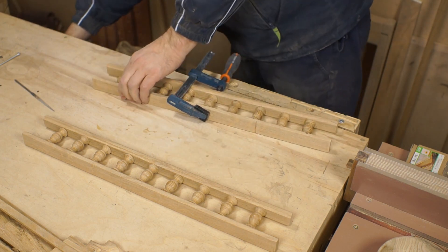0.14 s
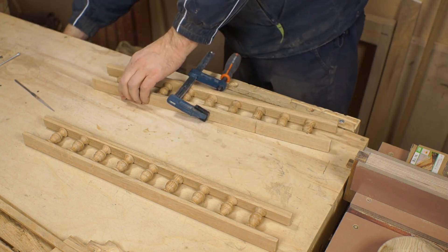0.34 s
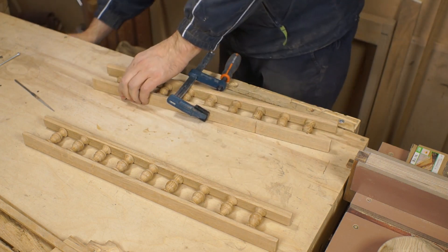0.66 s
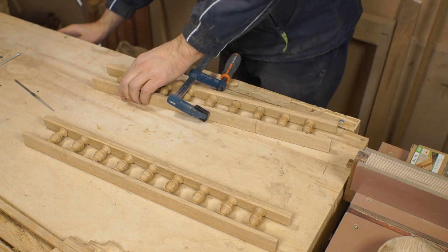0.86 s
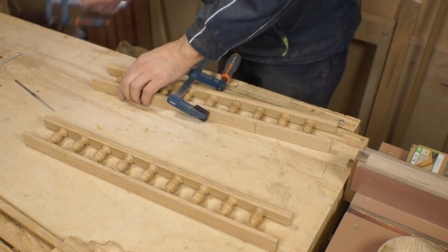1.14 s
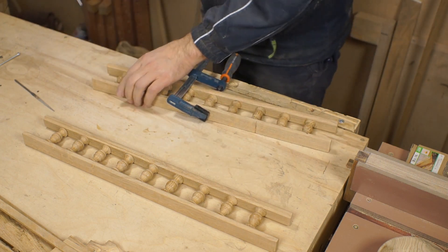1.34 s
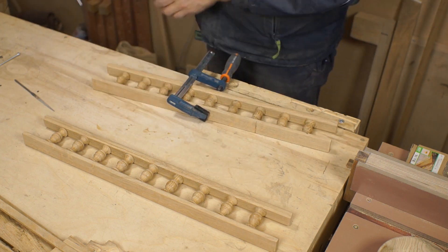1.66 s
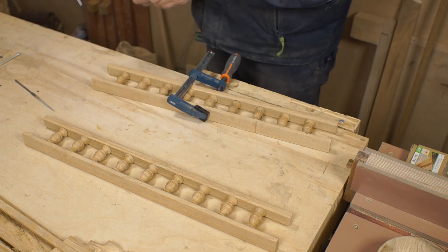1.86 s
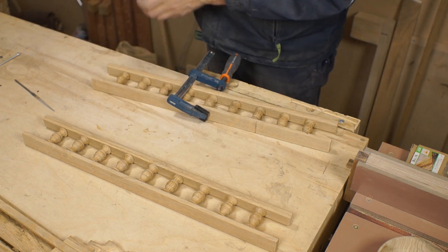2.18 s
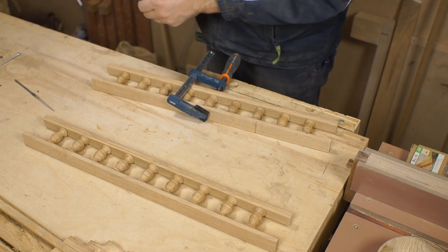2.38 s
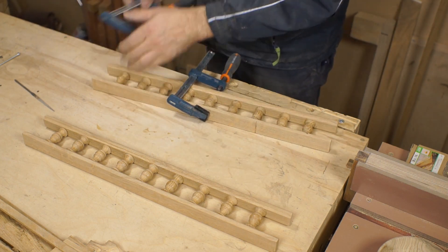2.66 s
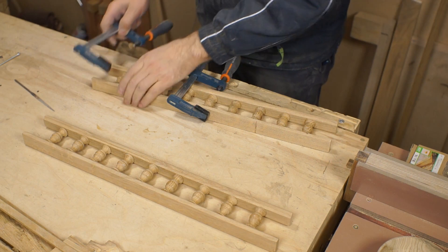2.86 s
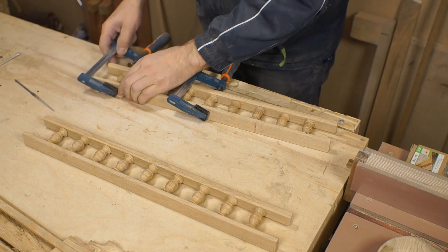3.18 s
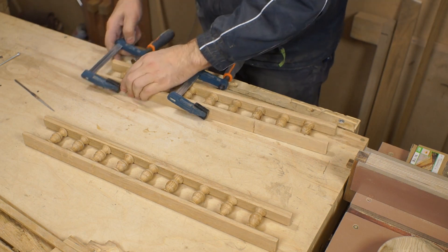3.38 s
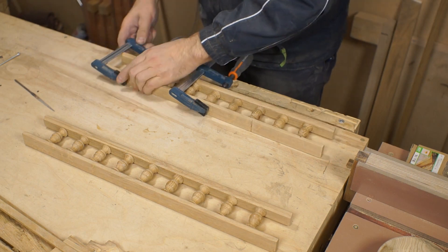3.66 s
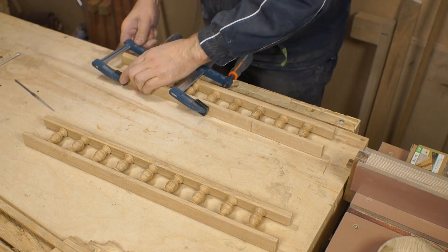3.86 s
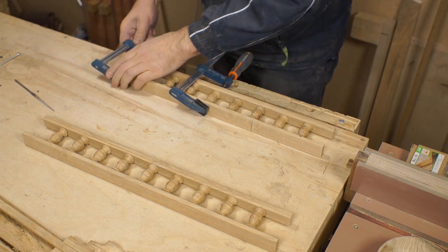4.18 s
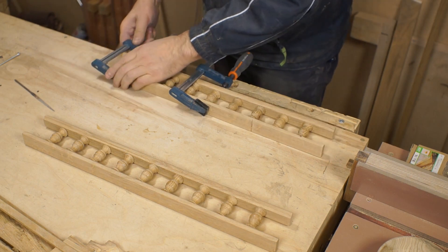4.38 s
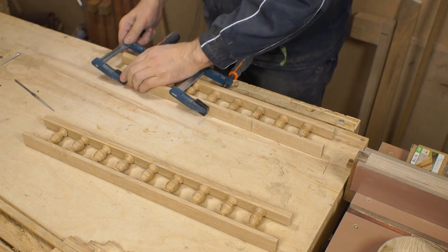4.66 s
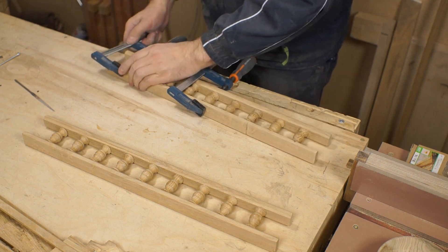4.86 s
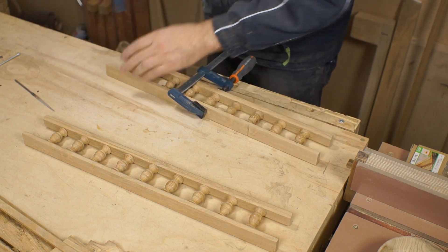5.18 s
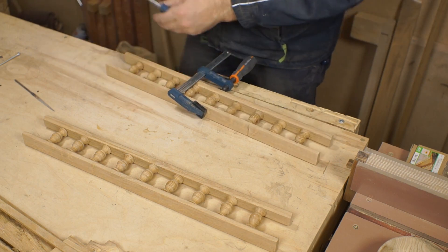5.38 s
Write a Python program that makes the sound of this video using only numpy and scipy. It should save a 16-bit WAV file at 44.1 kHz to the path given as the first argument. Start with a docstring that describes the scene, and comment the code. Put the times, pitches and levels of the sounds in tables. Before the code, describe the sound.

A wooden railing thumps and drags on a workbench, with a few ringing clinks and dry clacks from a steel bar clamp. After a short lull, the clamp's jaw rattles and clicks along its serrated bar. More wooden knocks and scrapes follow with a second, shorter slide, then two firm thumps and light metal clicks. Sleeves rustle faintly. It all sounds close, in a small, quiet workshop.

```python
"""Clamping a wooden railing

In a small workshop, a glued railing thumps and drags on a bench while a steel bar clamp is fitted.
The bar rings as it is picked up; the jaw rattles along its serrations, catches and clacks to a stop.
The screw squeaks faintly, and sleeves rustle between the moves."""
import sys
import numpy as np
from scipy import signal
from scipy.fft import rfft, irfft, next_fast_len
from scipy.io import wavfile

SR = 44100
rng = np.random.default_rng(int(sys.argv[2]) if len(sys.argv) > 2 else 0)


def waveform_to_disk(signal):
    """Save audio, clipped to [-1, 1], as 16-bit WAV at the path in sys.argv[1]."""
    frames = np.transpose(np.atleast_2d(signal))
    scaled = np.clip(frames, -1, 1) * 32767
    samples = np.round(scaled).astype(np.int16)
    wavfile.write(sys.argv[1], SR, samples)


N = 243873
RING_TIME_S = np.arange(int(SR * .7)) / SR


def amp(db):
    """Decibels to gain."""
    return 10 ** (np.asarray(db) / 20)


def unit_rms(x):
    """Scales to rms 1."""
    return x / np.sqrt(np.mean(x ** 2) + 1e-20)


def unit_hit(x):
    """Scales to the energy of 30 ms at rms 1."""
    return x * np.sqrt(SR * .03 / (np.sum(x ** 2) + 1e-20))


def lookup(points, hz):
    """Interpolates a table over log frequency."""
    points_hz, values = np.transpose(points)
    return np.interp(np.log(hz + 1), np.log(points_hz + 1), values)


def add(mix, time_s, sound):
    """Mixes a sound in at time_s."""
    part = mix[max(round(time_s * SR), 0):][:len(sound)]
    part += sound[:len(part)]


def colour(x, spectrum):
    """Filters by (frequency [Hz], level [dB]) points; rms 1."""
    size = next_fast_len(len(x))
    gain = amp(lookup(spectrum, np.fft.rfftfreq(size, 1 / SR)))
    return unit_rms(irfft(rfft(x, size) * gain, size)[:len(x)])


def butter(x, hz, kind):
    """Second-order low-pass or high-pass."""
    return signal.lfilter(*signal.butter(2, np.clip(hz, 20, SR * .45), kind, fs=SR), x)


def decay(t60_s):
    """Exponential decay."""
    return np.exp(-np.log(1000) * RING_TIME_S / t60_s)


def attack(rise_s, delay_s=0):
    """Exponential rise to 1."""
    return 1 - np.exp(-np.maximum(RING_TIME_S - delay_s, 0) / rise_s)


def ring(modes, pitch=1, spread_db=0):
    """Decaying modes; spread_db varies their strengths, as the place struck does."""
    out = np.zeros(len(RING_TIME_S))
    for k, (hz, db, t60_s) in enumerate(modes):
        gain = (-1) ** k * amp(db + spread_db * rng.standard_normal())
        out += gain * decay(t60_s) * np.sin(2 * np.pi * hz * pitch * RING_TIME_S)
    return out


def dense_ring(spectrum, t60_s):
    """Unresolved modes: a decaying noise burst."""
    return unit_hit(colour(rng.standard_normal(len(RING_TIME_S)), spectrum) * decay(t60_s))


def stick_slip(rate_hz, spread_db, hiss, burst_s=.0007):
    """Friction: uneven noise bursts over a steady hiss."""
    size = amp(spread_db * np.minimum(rng.exponential(1, N), 3))
    slips = rng.random(N) < rate_hz / SR
    power = signal.lfilter([1], [1, -np.exp(-1 / (burst_s * SR))], size ** 2 * slips)
    return unit_rms(np.sqrt(power / power.mean() + hiss ** 2) * rng.standard_normal(N))


def stroke(start_s, length_s, rise_s, t60_s):
    """Envelope of a push: rise, hold, decay."""
    t = np.arange(N) / SR - start_s
    return np.clip(t / rise_s, 0, 1) * np.exp(-np.log(1000) * np.clip((t - length_s) / t60_s, 0, 2))


def swells(moves):
    """Envelope of smooth moves, one bell curve each."""
    t = np.arange(N) / SR
    power = sum(amp(2 * db) * np.exp(-np.minimum((2 * (t - peak_s) / length_s) ** 2, 20))
                for peak_s, length_s, db in moves)
    return np.sqrt(power)


# Wood set down: (time [s], level [dB], contact hardness [Hz], mode pitch [ratio])
WOOD_KNOCKS = [(0.137, -34.5, 343, 1.195), (0.14, -44, 1300, 1.09), (0.612, -58, 398, 1.7),
               (0.738, -48, 1290, 1), (0.757, -39.5, 1200, 0.92), (0.823, -34.5, 564, 1.62),
               (0.841, -38, 470, 1.8), (0.917, -40, 1140, 0.79), (0.922, -37.5, 454, 1.73),
               (0.936, -43.5, 500, 1.4), (0.976, -48.5, 910, 0.97), (1.145, -45, 1020, 0.89),
               (1.152, -40.5, 570, 1.08), (2.903, -62.5, 213, 0.99), (3.172, -40.5, 576, 1.09),
               (3.193, -48, 930, 0.97), (3.272, -44.5, 416, 0.95), (3.577, -44.5, 400, 1.1),
               (3.705, -47.5, 480, 1.0), (3.811, -47, 1040, 0.98), (3.859, -44, 355, 1.02),
               (4.552, -35.5, 397, 0.98), (4.568, -49, 816, 1.02), (4.941, -34, 396, 1.006),
               (4.966, -44, 870, 1.0)]
# Bench top and railing: (frequency [Hz], level [dB], T60 [s])
BENCH_MODES = [(69.9, -5.5, 0.63), (94.3, -12, 0.13), (149.7, 13, 0.17), (183, 8, 0.017),
               (245.7, -0.5, 0.076), (310, -8, 0.029), (364, -13.5, 0.44), (407, -28, 0.06),
               (572, -13, 0.19), (629, -2.5, 0.21), (710, -15, 0.085), (889, -1, 0.14), (1150, -33, 0.051),
               (1384, -2, 0.091)]
# Dense wood modes: (frequency [Hz], level [dB])
WOOD_SPECTRUM = [(60, -37), (150, -2.5), (350, 3.5), (700, -5.5), (1300, -6.5), (2500, -7), (6000, -1.5),
                 (15000, -1.5)]


def knocks(dense_db=9, dense_db_per_octave=6.5, bass_cut_ratio=.27):
    """Railing hits bench: soft contacts ring the low modes, light, hard ones the high."""
    out = np.zeros(N)
    for time_s, db, hard_hz, pitch in WOOD_KNOCKS:
        body = unit_hit(ring(BENCH_MODES, pitch, spread_db=4))
        body += amp(dense_db + dense_db_per_octave * np.log2(pitch)) * dense_ring(WOOD_SPECTRUM, .17)
        body = butter(body, hard_hz, "low")
        body = butter(body, 1.89 * hard_hz, "low")  # rounded contact, no sharp edge
        body = butter(body, bass_cut_ratio * hard_hz * pitch, "high")
        add(out, time_s, amp(db) * unit_hit(body))
    return out


# Shoves: (start [s], length [s], level [dB], groan [dB re rasp], shudder [dB re rasp])
SHOVES = [(0.079, 0.074, -58, -5, -2), (0.14, 0.17, -54.5, -5, -13), (0.297, 0.049, -45.5, -14, -7.5),
          (0.36, 0.17, -51, -5.5, 3.5), (0.55, 0.14, -59.5, -9, -1), (0.76, 0.2, -50.5, -3, -0.5),
          (2.999, 0.035, -64.5, -19, -2.5), (3.22, 0.17, -62, -13, -12), (3.38, 0.17, -52, 1.5, -25),
          (3.53, 0.098, -54, 5.5, -23), (3.688, 0.046, -49.5, -2, -14), (3.82, 0.032, -53, -2.5, -1),
          (4.0, 0.22, -74.5, -6, -4), (4.449, 0.017, -70, 1.5, 7.5), (4.76, 0.12, -55, 2, -4.5),
          (4.98, 0.14, -65.5, -6, 5.5)]
# Wood on wood: (frequency [Hz], level [dB])
RASP_SPECTRUM = [(50, -15), (80, -37), (115, -18), (170, -4), (250, 8), (380, -5.5), (600, 2), (900, -5),
                 (1400, -7.5), (2200, -15.5), (5000, -23), (10000, -32.5), (16000, -46)]
# Railing groan: (frequency [Hz], level [dB], T60 [s])
GROAN_MODES = [(171, -0.5, 0.15), (324, 5.5, 0.047), (374, 4.5, 0.17), (407, -2, 0.11), (546.5, -0.5, 0.12),
               (580, -23.5, 0.2)]
# Bench shudder: (frequency [Hz], level [dB], T60 [s])
SHUDDER_MODES = [(71, -9, 0.34), (95.6, -9, 0.2), (156.7, 0.5, 0.26), (169.5, 2.5, 0.081), (219, -3, 0.17)]


def railing_drag():
    """Wood judders over wood; the railing groans and the bench top shudders."""
    judder = stick_slip(rate_hz=300, spread_db=4, hiss=.78, burst_s=.0045)
    rasp = colour(judder, RASP_SPECTRUM)
    groan = unit_rms(signal.fftconvolve(judder, ring(GROAN_MODES))[:N])
    shudder = unit_rms(signal.fftconvolve(judder, ring(SHUDDER_MODES))[:N])
    out = np.zeros(N)
    for start_s, length_s, db, groan_db, shudder_db in SHOVES:
        envelope = amp(db) * stroke(start_s, length_s, rise_s=.025, t60_s=.13)
        out += envelope * (rasp + amp(groan_db) * groan + amp(shudder_db) * shudder)
    return out


# Jaw pushes: (start [s], length [s], level [dB], brightness [Hz])
JAW_PUSHES = [(2.124, 0.022, -61, 5000), (2.145, 0.094, -49.5, 8000), (2.255, 0.098, -49, 15200),
              (2.362, 0.039, -45, 11400), (2.417, 0.055, -54.5, 10000), (3.391, 0.18, -71, 6000),
              (3.542, 0.06, -62, 12900), (3.599, 0.073, -54.5, 9900), (3.677, 0.023, -46.5, 7050)]
# Serration chatter: (frequency [Hz], level [dB])
CHATTER_SPECTRUM = [(300, -41), (600, -18), (900, -11), (1500, -4.5), (2300, -8.5), (3000, -3.5),
                    (3700, 5.5), (5000, 1.5), (6500, 3), (8500, 3), (9700, -11), (12300, 0), (13300, -28),
                    (15500, -7)]


def jaw_slide(dull_hz=4500, bright_hz=15000):
    """The jaw chatters over the serrations, brighter on faster pushes."""
    chatter = colour(stick_slip(rate_hz=660, spread_db=6, hiss=.59, burst_s=.0014), CHATTER_SPECTRUM)
    dull = unit_rms(butter(chatter, dull_hz, "low"))
    bright = unit_rms(butter(chatter, bright_hz, "low"))
    out = np.zeros(N)
    for start_s, length_s, db, hz in JAW_PUSHES:
        speed = np.clip((hz - dull_hz) / (bright_hz - dull_hz), 0, 1)
        blend = np.sqrt(1 - speed) * dull + np.sqrt(speed) * bright
        out += amp(db) * stroke(start_s, length_s, rise_s=.012, t60_s=.071) * blend
    return out


def jaw_rattle(rate_hz=55, offset_db=-3, spread_db=4, ring_db=-4.5):
    """Small, uneven catches of the sliding jaw, as rows like HARD_CATCHES."""
    rows = []
    for start_s, length_s, push_db, bright_hz in JAW_PUSHES:
        for k, (jitter, size, place) in enumerate(rng.random((20, 3))):
            after_s = (k + jitter) / rate_hz
            if after_s < length_s:
                db = push_db + offset_db + spread_db * (2 * size - 1)
                rows.append((start_s + after_s, db, ring_db, bright_hz * 2 ** (place - .5)))
    return rows


# Jaw catches on the bar: (time [s], level [dB], ring [dB re snap], ring centre [Hz])
HARD_CATCHES = [(1.938, -56.5, 8.5, 1900), (1.986, -58.5, 6, 3230), (2.154, -42, -5, 2590),
                (2.173, -48, 7, 2800), (2.194, -48, -14, 2980), (2.205, -43, -7, 6070),
                (2.224, -48, 6, 2960), (2.242, -46.5, -4, 3500), (2.263, -43.5, -5, 6000),
                (2.271, -47.5, -7, 7000), (2.283, -42, 4, 7200), (2.309, -47.5, -2, 8400),
                (2.371, -55, 2, 9050), (2.398, -46.5, -21, 7500), (2.576, -64, 4, 4500),
                (2.622, -58, 2, 11300), (2.628, -47, 4, 2530), (2.636, -47, 6, 5260), (2.646, -44, 0, 2580),
                (2.689, -56.5, -4, 11100), (3.181, -65.5, 10, 3570), (3.286, -72.5, 14, 4500),
                (3.551, -58.5, -10, 11010), (3.576, -55.5, -14, 11000), (3.604, -49, -17, 9000),
                (3.622, -56, -19, 7900), (3.655, -50, 1, 6000), (3.686, -53, 14, 9700),
                (3.703, -49.5, 8.5, 3720), (3.809, -56.5, 14, 3640), (5.417, -56.5, 5, 3930),
                (5.437, -51.5, 0.5, 8000), (5.508, -63.5, 1, 4000)]
# Gripped clamp: (frequency [Hz], level [dB], T60 [s])
JAW_MODES = [(2030, -3, 0.1), (2376, 3, 0.058), (2503, 1, 0.056), (3363, -2, 0.077), (3680, 5, 0.03),
             (3780, -5, 0.088), (4130, -4, 0.047), (6070, -7.5, 0.1), (6550, -15, 0.12),
             (7400, -13.5, 0.09), (9270, -4, 0.046), (9780, -0.5, 0.037), (11400, -9, 0.14),
             (12900, -16, 0.047)]
# Dense steel modes: (frequency [Hz], level [dB])
STEEL_SPECTRUM = [(100, -52), (400, -50), (900, -12), (1600, -13), (2400, -0.5), (3700, 2.5), (5000, -2.5),
                  (6500, 6), (8500, 1.5), (9800, 2.5), (12000, 1), (13500, 0), (16000, -8)]


def jaw_catches(crack_db=2, detune=.007, focus_db_per_octave=24):
    """Snap, crack and hand-damped ring; the jaw's position picks and detunes the modes."""
    out = np.zeros(N)
    for time_s, db, ring_db, centre_hz in HARD_CATCHES + jaw_rattle():
        hard_hz = 6760 * (centre_hz / 4000) ** .53
        modes = [(hz, mode_db - focus_db_per_octave * abs(np.log2(hz / centre_hz)), t60_s)
                 for hz, mode_db, t60_s in JAW_MODES]
        snap = unit_hit(butter(dense_ring(STEEL_SPECTRUM, t60_s=.0065), .8 * hard_hz, "low"))
        crack = unit_hit(butter(dense_ring(STEEL_SPECTRUM, t60_s=.082), hard_hz, "low"))
        ringing = unit_hit(ring(modes, pitch=1 + detune * rng.standard_normal()))
        tail = (amp(crack_db) * crack + amp(ring_db) * ringing) * attack(rise_s=.00056)
        add(out, time_s, amp(db) * unit_hit(snap + tail))
    return butter(out, 1200, "high")  # the catches carry no low thump


# Clamp on wood: (time [s], level [dB], contact hardness [Hz], T60 [s])
CLAMP_HITS = [(0.144, -56.5, 6200, 0.18), (0.19, -62, 11900, 0.078), (0.607, -42, 2370, 0.28),
              (0.612, -44.5, 2640, 0.093), (0.76, -44.5, 2920, 0.039), (0.822, -51.5, 2440, 0.23),
              (1.144, -60.5, 3520, 0.016), (4.551, -61.5, 3000, 0.038), (4.922, -48.5, 6750, 0.089),
              (4.942, -54.5, 3520, 0.33)]
# Dense clamp modes: (frequency [Hz], level [dB])
CLACK_SPECTRUM = [(400, 1.5), (900, -11.5), (1600, -3), (3000, -1.5), (5000, -6.5), (7500, -3.5),
                  (11000, -7.5), (16000, -16)]


def clamp_clacks():
    """The clamp strikes wood with a dry clack."""
    out = np.zeros(N)
    for time_s, db, hard_hz, t60_s in CLAMP_HITS:
        clack = butter(dense_ring(CLACK_SPECTRUM, t60_s), hard_hz, "low")
        add(out, time_s, amp(db) * unit_hit(clack))
    return out


# Strikes on the hanging bar: (time [s], level [dB], contact hardness [Hz])
BAR_HITS = [(0.309, -46.5, 7600), (0.456, -47, 10100), (0.491, -49, 8140)]
# Bar bending: (frequency [Hz], level [dB], T60 [s])
BAR_MODES = [(1607, 1.5, 0.25), (2039, 3.5, 0.3), (2137, -1, 0.63), (2930, -8.5, 0.59), (4056, 2, 0.2),
             (4190, 5, 0.071), (5870, -0.5, 0.19), (6880, 6, 0.15), (6927, 9.5, 0.065), (7650, -10, .2),
             (8400, -9, 0.14), (9100, -5, 0.15), (10800, -17, 0.21), (11460, -7, 0.1)]


def bar_clinks(shake_depth=.25, shake_hz=80, buzz_db=-10):
    """The steel bar rings; the loose jaw buzzes on it and roughens the tone."""
    out = np.zeros(N)
    for time_s, db, hard_hz in BAR_HITS:
        shake = unit_rms(butter(rng.standard_normal(len(RING_TIME_S)), shake_hz, "low"))
        ringing = unit_hit(ring(BAR_MODES, spread_db=-2.5) * (1 + shake_depth * shake))
        buzz = amp(buzz_db) * dense_ring(CLACK_SPECTRUM, t60_s=.39)
        clink = butter(ringing + buzz, hard_hz, "low") * attack(rise_s=.001)
        add(out, time_s, amp(db) * unit_hit(clink))
    return out


# Arm moves: (peak time [s], length [s], level [dB])
ARM_MOVES = [(0.8, 0.58, -71), (1.32, 0.33, -71), (1.86, 0.18, -61.5), (2.1, 0.9, -69.5), (2.92, 0.17, -74),
             (4.05, 0.039, -68), (4.18, 0.14, -71), (4.54, 0.065, -66.5), (4.81, 0.1, -63.5),
             (5.12, 0.052, -70), (5.285, 0.051, -61.5), (5.45, 0.43, -65.5)]
# Cloth rustle: (frequency [Hz], level [dB])
CLOTH_SPECTRUM = [(150, -6), (250, -8.5), (298, -8), (336, -8), (393, -7), (429, -7.5), (618, -5.5),
                  (2360, -2), (9660, -11), (16000, -18)]


def sleeve_rustle():
    """Cloth fibres brush each other as the arm swings."""
    friction = stick_slip(rate_hz=4300, spread_db=4.5, hiss=.87, burst_s=.00032)
    return swells(ARM_MOVES) * colour(friction, CLOTH_SPECTRUM)


# Screw twists: (time [s], level [dB])
TWISTS = [(4.118, -80), (4.17, -69), (4.248, -77)]
# Screw resonance: (frequency [Hz], level [dB])
SCREW_SPECTRUM = [(1500, -60), (2550, -24), (2730, 10), (2900, -16), (3100, -30), (5000, -60)]


def screw_squeaks(length_s=.02):
    """The thread sticks and slips, exciting one narrow resonance."""
    friction = stick_slip(rate_hz=220, spread_db=10, hiss=.72)
    return swells([(time_s, length_s, db) for time_s, db in TWISTS]) * colour(friction, SCREW_SPECTRUM)


# Reverb decay: (frequency [Hz], T60 [s])
TAIL_T60 = [(100, 0.37), (300, 0.28), (700, 0.34), (2000, 0.42), (5000, 0.37), (10000, 0.33), (16000, .22)]
# Reverb level: (frequency [Hz], level [dB re direct])
TAIL_LEVEL = [(60, -7.5), (200, -11.5), (600, -1), (2000, -3.5), (5000, -4.5), (10000, -9.5), (16000, -13)]
# Reverb width: (frequency [Hz], side/mid [ratio])
TAIL_WIDTH = [(60, 0.37), (150, 0.51), (300, 0.54), (800, 0.57), (2500, 0.42), (5000, 0.45), (8000, 0.04),
              (16000, 0.05)]
# Early side reflections: (delay [s], level [dB])
REFLECTIONS = [(.0004, -53), (.0013, -20.5), (.0031, -32)]


def workshop_reverb(direct):
    """Direct sound, side reflections and a tail that builds fast and decays by band."""
    hz, t, bands = signal.stft(rng.standard_normal((2, len(RING_TIME_S))), SR, nperseg=256)
    t60_s = lookup(TAIL_T60, hz)[:, None]
    bands *= np.exp(-np.log(1000) * t / t60_s)
    bands *= np.sqrt(2 * np.log(1000) / (t60_s * SR))  # unit-energy decay
    bands *= amp(lookup(TAIL_LEVEL, hz))[:, None]
    bands[1] *= lookup(TAIL_WIDTH, hz)[:, None]
    tails = signal.istft(bands, SR, nperseg=256)[1][:, :len(RING_TIME_S)]
    tails *= attack(rise_s=.0032, delay_s=.0085)
    mid, side = signal.fftconvolve(direct[None], tails, axes=1)[:, :N]
    for k, (delay_s, db) in enumerate(REFLECTIONS):
        add(side, delay_s, (-1) ** k * amp(db) * direct)
    return np.array([direct + mid + side, direct + mid - side])


# Still workshop: (frequency [Hz], level [dB])
ROOM_TONE_SPECTRUM = [(10, -23), (28, 10.5), (45, -1), (70, -5), (150, -7.5), (250, -11), (500, -16.5),
                      (900, -22), (2500, -22), (4000, -25), (8400, -28), (16000, -31.5)]


def room_tone(level_db=-71.5, width=.14):
    """Low rumble and faint hiss."""
    mid, side = (colour(rng.standard_normal(N), ROOM_TONE_SPECTRUM) for _ in range(2))
    return amp(level_db) * np.array([mid + width * side, mid - width * side])


def scene():
    """All handling at one spot near the centre, over room tone."""
    background = room_tone() * amp([[-.4], [.4]])
    handling = (knocks() + clamp_clacks() + bar_clinks() + jaw_slide() + railing_drag()
                + sleeve_rustle() + screw_squeaks() + jaw_catches())
    return workshop_reverb(handling) * amp([[.2], [-.2]]) + background


def record(dry):
    """Steep low-pass at 15950 Hz."""
    taps = signal.firwin(511, 15950, window=("kaiser", 9), fs=SR)
    return signal.oaconvolve(dry, taps[None], "same")


dry = scene()
out = record(dry)
waveform_to_disk(out)
```